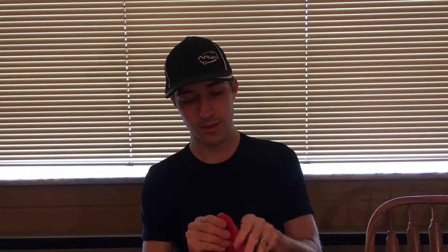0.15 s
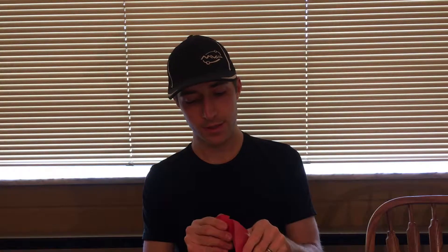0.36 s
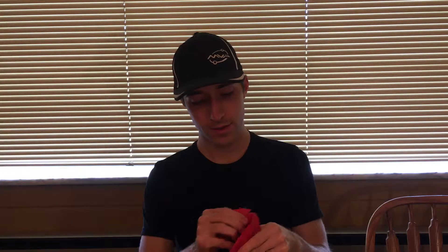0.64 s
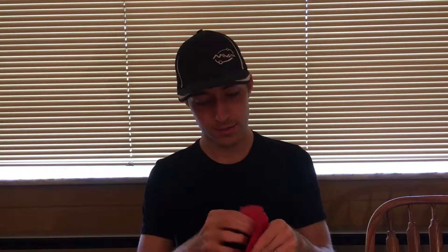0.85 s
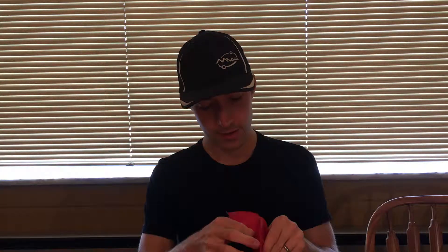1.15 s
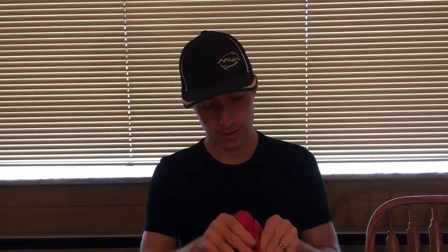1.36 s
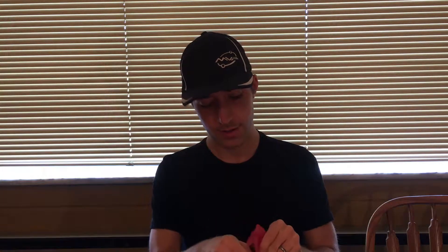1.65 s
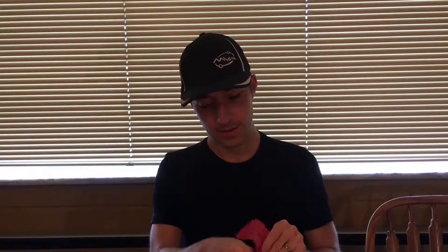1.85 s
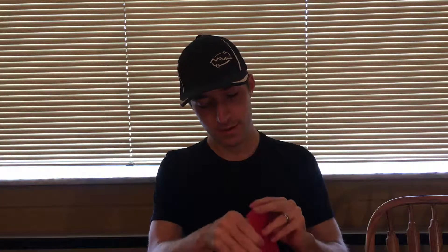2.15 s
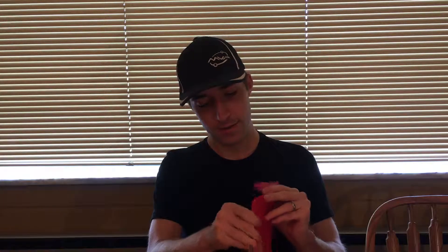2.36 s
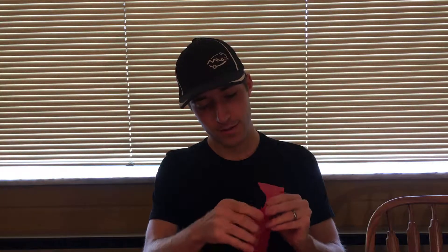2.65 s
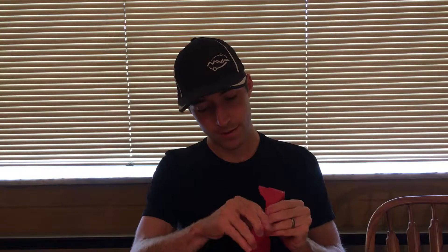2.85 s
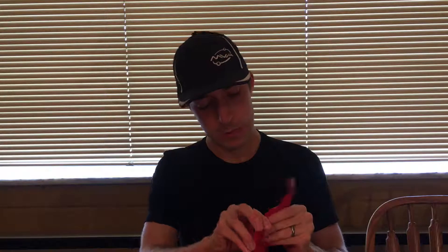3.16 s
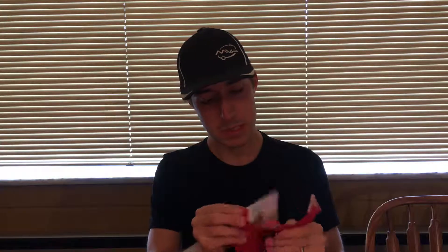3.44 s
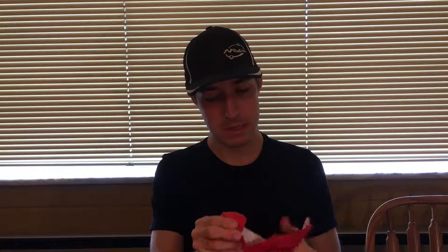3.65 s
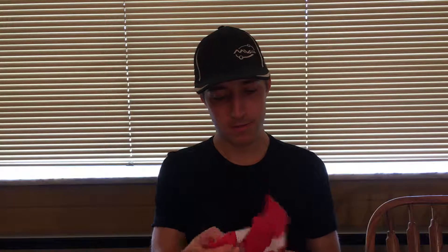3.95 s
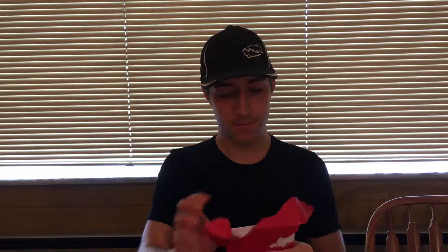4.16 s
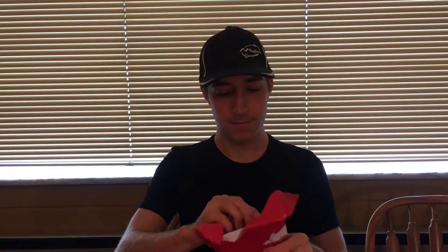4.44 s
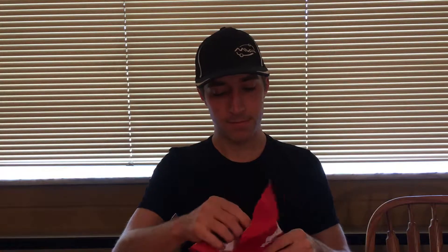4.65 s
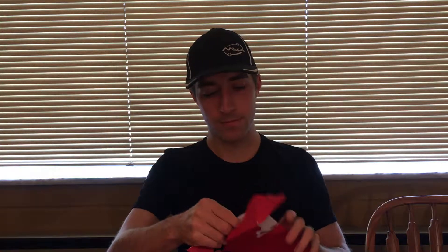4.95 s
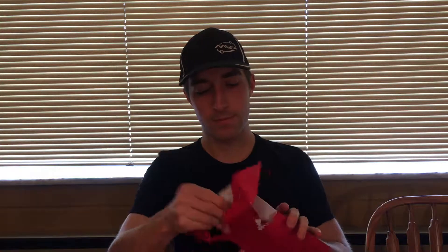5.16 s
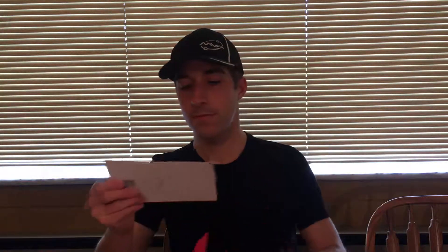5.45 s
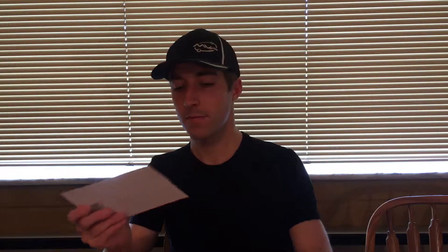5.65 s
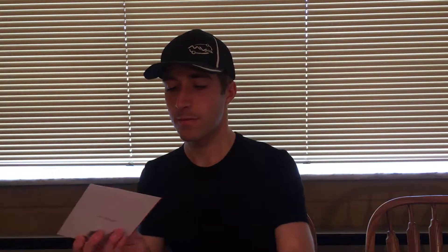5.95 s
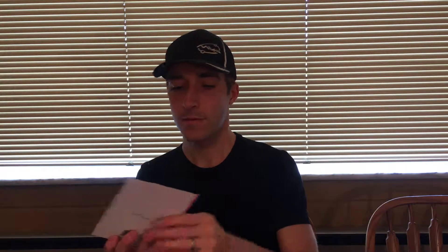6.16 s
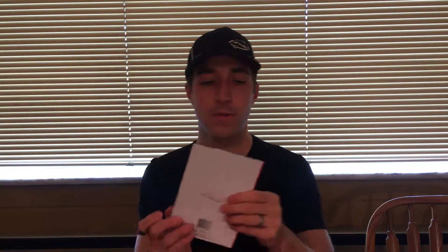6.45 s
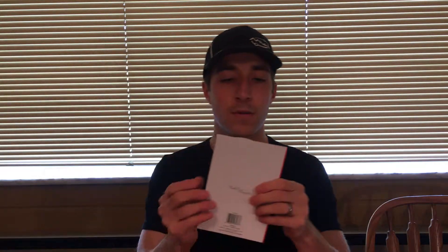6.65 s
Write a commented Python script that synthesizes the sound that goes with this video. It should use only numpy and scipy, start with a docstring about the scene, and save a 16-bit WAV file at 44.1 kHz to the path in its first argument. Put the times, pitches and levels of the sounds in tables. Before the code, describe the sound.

Crisp paper tearing comes in uneven bursts with light rubbing between, fading to faint card handling over a very quiet indoor rumble and hum.

```python
"""Small room: a paper envelope is ripped open by hand, in snaps and short crackling rips.
Fingers rub and flex the paper, then a card slides out and is turned over.
Paper sounds are shaped noise: decaying volleys, trains of fibre breaks, slow bursts and friction hiss.
Random decaying echoes follow; filtered noise and two wavering sines give faint rumble and appliance hum."""
import sys
import numpy as np
from scipy import signal
from scipy.fft import rfft, irfft, next_fast_len
from scipy.io import wavfile
from scipy.ndimage import uniform_filter1d, map_coordinates

SR = 44100
rng = np.random.default_rng(int(sys.argv[2]) if len(sys.argv) > 2 else 0)


def digitize_waveform(pressure):
    """Quantize a signal to 16-bit integers and store it at the path in sys.argv[1].

    Rows of a 2-D input are taken as channels; values are limited to [-1, 1].
    """
    field = np.atleast_2d(pressure).T
    bounded = np.clip(field, -1, 1)
    quanta = np.round(bounded * 32767).astype(np.int16)
    wavfile.write(sys.argv[1], SR, quanta)


N = 299877
SPLIT_HZ = 3500  # sheet below, fibres above
TOP_HZ = 15950  # band limit


# paper buckles or a glued spot lets go: [t/s, sheet level/dB, crack level/dB], before colouring
SNAPS = [(0.1327, -33, -19.5), (0.1516, -18, -15.5), (0.1585, -27.5, -25), (0.2713, -58.5, -34.5),
         (0.3086, -37, -21), (0.3334, -28, -19.5), (0.504, -34, -28), (0.5915, -52, -26.5),
         (0.5991, -47.5, -25.5), (0.6265, -58, -31), (0.6465, -53, -32), (0.7679, -29, -23),
         (1.2125, -67, -39.5), (1.251, -48, -31.5), (1.277, -33, -28.5), (1.3284, -46, -29.5),
         (1.365, -33, -22.5), (1.449, -21.5, -17), (1.6119, -27.5, -16.5), (2.266, -55, -29.5),
         (2.3289, -28.5, -24), (2.5485, -52, -32), (2.5702, -29, -27), (2.75, -40, -40),
         (2.9057, -19.5, -11), (2.9407, -19.5, -17), (3.196, -20, -16), (3.2579, -20.5, -14),
         (3.4002, -36, -24.5), (3.4273, -38, -20), (3.45, -19.5, -13.5), (3.5202, -22.5, -13),
         (3.55, -29, -14.5), (3.706, -35, -29.5), (3.7473, -23, -23.5), (3.7686, -27, -28.5),
         (4.018, -29, -32.5), (4.7128, -40, -37), (4.863, -48, -46.5), (5.913, -39.5, -32.5),
         (5.988, -58, -37), (6.125, -73, -49.5), (6.2557, -75, -48)]
# snap spectrum: [f/Hz, relative density level/dB]
SNAP_COLOUR = [(150, -26.5), (550, -13), (780, -20), (1150, -10), (2200, -4), (3300, -5.5), (4400, 0.5),
               (5000, -2.5), (6100, 2), (7500, -1.5), (10400, -3.5), (13000, 1), (15800, -1)]


def snaps(burst_s=0.003, tick=0.4, ring_t60_s=0.015, ring_share=0.18, ring_hz=1950, ring_spread=0.54, modes=14):
    """A sharp first break, then a volley a few ms long that rings a new patch of the sheet."""
    t = np.arange(SR // 12) / SR
    volley = (1 - np.exp(-t / 0.000078)) / (1 + (t / burst_s) ** 3)
    volley_rms = np.sqrt(np.mean(volley ** 2))
    sheet, crack = np.zeros((2, N + len(t)))
    for start_s, sheet_db, crack_db in SNAPS:
        breaks = volley * rng.standard_normal(len(t))
        breaks[0] = tick * np.linalg.norm(breaks)
        breaks = volley_rms * unit(breaks)

        modes_hz = ring_hz * np.exp(ring_spread * rng.standard_normal((modes, 1)))
        patch = np.sin(2 * np.pi * modes_hz * t).sum(0) * amp(-60 * t / ring_t60_s)
        ring = volley_rms * unit(signal.fftconvolve(breaks, patch)[:len(t)])

        start = round(start_s * SR)
        sheet[start:start + len(t)] += amp(sheet_db) * (breaks + ring_share * ring)
        crack[start:start + len(t)] += amp(crack_db) * breaks
    return paper(sheet[:N], crack[:N], SNAP_COLOUR)


# running tears: [start t/s, end t/s, first level/dB, last level/dB, sheet level/dB re crack], before trims
RIPS = [(0.057, 0.086, -32, -27, -6), (0.09, 0.172, -23, -25.5, -2.5), (0.301, 0.34, -20, -20, -14),
        (0.592, 0.63, -35.5, -41.5, -6.5), (1.232, 1.404, -50, -30.5, -8.5),
        (1.41, 1.524, -24, -22.5, -7.5), (1.589, 1.669, -23, -25, -8.5), (1.814, 1.885, -32.5, -30, -9),
        (1.886, 1.973, -32, -39.5, -4), (2.275, 2.316, -34, -38, -7), (2.321, 2.345, -35.5, -25, -7),
        (2.564, 2.596, -36, -36, -3), (2.911, 2.982, -30, -47, 1.5), (3.19, 3.241, -24.5, -27.5, -8.5),
        (3.256, 3.336, -19.5, -30, -14), (3.447, 3.547, -25.5, -27, -5.5)]
# rip spectrum: [f/Hz, relative density level/dB]
RIP_COLOUR = [(150, -14.5), (450, -11), (760, -9.5), (1050, -6), (1700, -4), (2900, -1), (4300, -3.5),
              (4950, -4), (6100, 2), (7500, -3), (9000, 2.5), (10400, -2), (13000, 3.5), (15800, 0.5)]


def rips(attack_s=0.0049, release_s=0.0092, jerk_db=2.0, surge_db=-0.5, sheet_trim_db=-2, crack_trim_db=-2.0):
    """A running tear starts quickly, breaks thousands of fibres a second and advances in small jerks."""
    t = np.arange(N) / SR
    sheet, crack = np.zeros((2, N))
    for start_s, end_s, first_db, last_db, sheet_db in RIPS:
        attack = np.clip((t - start_s) / attack_s, 0, 1)
        release = np.exp(-np.clip((t - end_s) / release_s, 0, 20))
        pull = amp(np.interp(t, [start_s, end_s], [first_db, last_db])) * attack * release
        crack += pull
        sheet += pull * amp(sheet_db)

    jerks_db = jerk_db * np.clip(wobble(420), -2, 2)
    surges_db = surge_db * np.clip(wobble(130), -2, 2)
    advance = amp(jerks_db + surges_db)
    breaks = bending(fibres(rate_hz=11000, spread_db=4.5) * advance, depth_db=2)
    return paper(amp(sheet_trim_db) * sheet * breaks, amp(crack_trim_db) * crack * breaks, RIP_COLOUR)


# a fold or the card flips over: [t/s, level/dB before colouring, length/s]
FLAPS = [(0.29, -32, 0.0099), (0.4225, -39, 0.0078), (0.487, -35.5, 0.014), (0.77, -26.5, 0.0046),
         (1.022, -46, 0.0089), (2.08, -36.5, 0.0091), (2.1405, -35, 0.0097), (2.229, -30, 0.0052),
         (2.291, -29, 0.0074), (2.693, -40, 0.0038), (2.783, -31, 0.0058), (3.953, -43.5, 0.0032),
         (3.977, -43.5, 0.0067), (4.564, -47.5, 0.0063), (5.176, -41.5, 0.0084), (5.253, -25.5, 0.011),
         (5.401, -33, 0.01)]
# flap spectrum: [f/Hz, relative density level/dB]
FLAP_COLOUR = [(200, -12), (750, -15), (1150, -3), (2700, -4), (4500, -15.5), (15800, -28.5)]


def flaps(rise_s=0.00035):
    """A broad fold gives way more slowly than a snap and has little treble."""
    t = np.arange(SR // 12) / SR
    sheet = causal(amp(along(FLAP_COLOUR, np.fft.rfftfreq(1024, 1 / SR))))
    push = np.zeros(N + len(t))
    for start_s, level_db, length_s in FLAPS:
        swing = (1 - np.exp(-t / rise_s)) / (1 + (t / length_s) ** 4)
        start = round(start_s * SR)
        push[start:start + len(t)] += amp(level_db) * swing * rng.standard_normal(len(t))
    return signal.fftconvolve(push, sheet)[:N]


# rubbing spectrum: [f/Hz, relative density level/dB]
RUB_COLOUR = [(200, -5), (430, -2.5), (700, -6.5), (1200, -2.5), (1800, -4), (2600, -1.5), (4200, -2.5),
              (4900, -2.5), (6000, 2), (8000, -1), (10300, -0.5), (12800, 2), (15800, 0.5)]


def rubbing(crinkle_db=-5, crinkle_s=0.0021, sheet_trim_db=-4.5, hiss_trim_db=-2, uneven_db=1.0):
    """Sliding paper gives a fine hiss of catching fibres, with sparse crinkles on top."""
    sheet_gain, hiss_gain = sliding() * amp(uneven_db * wobble(45))
    friction = bending(fibres(rate_hz=30000, spread_db=2), depth_db=1)
    crackle = amp(crinkle_db) * crinkles(50, crinkle_s)
    sheet = amp(sheet_trim_db) * sheet_gain * (friction + crackle)
    hiss = amp(hiss_trim_db) * hiss_gain * (friction + crackle / 2)  # buckles sound mostly in the sheet
    return paper(sheet, hiss, RUB_COLOUR)


# finger or card slides; the first row, of zero length, is a hiss already fading as the scene opens: [start t/s,
# end t/s, hiss level/dB before sag and trim, sheet level/dB re hiss]
STROKES = [(0.0, -0, -36.5, 3), (0.343, 0.405, -49.5, 10.5), (0.485, 0.76, -45.5, -5),
           (0.744, 0.792, -40.5, -7), (0.989, 1.124, -49.5, -3.5), (1.193, 1.292, -43, -0.5),
           (1.525, 1.584, -38, -5), (1.963, 2.088, -50, 0.5), (2.176, 2.263, -45.5, 3.5),
           (2.34, 2.472, -44, -5), (2.523, 2.675, -46, 0), (2.712, 2.766, -38, -2),
           (2.8, 2.87, -48.5, -4.5), (3.069, 3.15, -36.5, -10), (3.407, 3.44, -31.5, -7.5),
           (3.56, 3.67, -46.5, -15), (3.697, 3.82, -48, 1), (3.839, 3.864, -37.5, -6.5),
           (3.886, 3.96, -51.5, -3), (3.982, 4.091, -42, -3.5), (4.188, 4.285, -52.5, -16),
           (4.311, 4.314, -46, -3.5), (4.529, 4.585, -47, -3.5), (4.603, 4.758, -52.5, -0.5),
           (4.854, 4.912, -43, -3.5), (4.915, 5.09, -42, -12), (5.116, 5.317, -38, -10.5),
           (5.228, 5.32, -33, -7.5), (5.373, 5.384, -43, -5), (5.844, 5.896, -43, -2.5),
           (5.87, 6.04, -44.5, -5.5), (6.29, 6.388, -56.5, -16), (6.46, 6.48, -63.5, -7)]
# faint stirring of the held paper between slides: [t/s, hiss level/dB before trim]
GRIP = [(0.0, -45), (0.7, -59), (0.95, -60), (1.5, -58.5), (3.0, -55), (3.9, -53.5), (4.4, -66), (4.8, -58),
        (5.4, -62.5), (5.6, -66), (6.79, -75)]


def sliding(rise_share=0.28, release_s=0.02, sag_db_per_s=5.5, grip_sheet_db=-1):
    """Sheet and hiss gains: a stroke gathers speed, its pressure eases, then it coasts to a stop."""
    t = np.arange(N) / SR
    hiss_power = amp(np.interp(t, *np.transpose(GRIP))) ** 2
    sheet_power = hiss_power * amp(grip_sheet_db) ** 2
    for start_s, end_s, hiss_db, sheet_db in STROKES:
        age_s = np.maximum(t - start_s, 0)
        rise_s = rise_share * abs(end_s - start_s) + 1e-6
        speed = np.minimum(age_s / rise_s, 1) * np.exp(-np.clip((t - end_s) / release_s, 0, 20))
        power = (speed * amp(hiss_db - sag_db_per_s * age_s)) ** 2
        hiss_power += power
        sheet_power += power * amp(sheet_db) ** 2
    return np.sqrt(sheet_power), np.sqrt(hiss_power)


def crinkles(rate_hz, length_s):
    """Small buckles at random moments, each a tiny noise burst; rms 1."""
    sizes = np.abs(fibres(rate_hz, spread_db=3))
    decay = np.exp(-np.arange(SR // 20) / SR / length_s)
    bursts = signal.fftconvolve(sizes, decay)[:N]
    return unit(bursts * rng.standard_normal(N))


def fibres(rate_hz, spread_db):
    """Tiny breaks at random moments, of widely differing sizes; rms 1."""
    happens = rng.random(N) < rate_hz / SR
    sizes = amp(spread_db * np.clip(rng.standard_normal(N), -2, 2))
    return unit(happens * sizes * rng.choice([-1, 1], N))


def bending(x, depth_db, bins=5, frames=14):
    """The sheet's resonances wander as the hands bend it; rms 1."""
    z = signal.stft(x, nperseg=256)[2]
    field = uniform_filter1d(rng.standard_normal(z.shape), bins, axis=0)
    field = uniform_filter1d(field, frames, axis=1)
    return unit(signal.istft(z * amp(depth_db * unit(field)), nperseg=256)[1][:N])


def paper(sheet, crack, colour, size=1024):
    """The flexing sheet radiates the middle range, the fibres themselves the treble."""
    hz = np.fft.rfftfreq(size, 1 / SR)
    gain = amp(along(colour, hz)) / np.sqrt(1 + (hz / TOP_HZ) ** 60)
    low = 1 / (1 + (hz / SPLIT_HZ) ** 8)
    body = signal.fftconvolve(sheet, causal(gain * np.sqrt(low)))
    edge = signal.fftconvolve(crack, causal(gain * np.sqrt(1 - low)))
    return (body + edge)[:N]


# late tail decay: [f/Hz, t60/s]
ROOM_DECAY = [(300, 0.53), (2500, 0.2555), (7000, 0.27), (15000, 0.2)]
# tail level: [f/Hz, level/dB]
ROOM_LEVEL = [(300, 1), (2000, -3), (6000, -5), (15000, -5.5)]


def room_answer(first_s=.007, early_db=3, early_s=0.0032):
    """The nearest surfaces answer first, then the walls; the treble dies soonest."""
    hz, t, z = signal.stft(rng.standard_normal(SR // 2), SR, nperseg=256)
    early = amp(early_db) * np.exp(-t / early_s)  # added to the tail, re its start
    fade = amp(-60 * t / along(ROOM_DECAY, hz)[:, None]) * (1 + early)
    band_norm = np.sqrt(np.mean(fade ** 2, axis=1, keepdims=True) * SR / 2)
    fade *= amp(along(ROOM_LEVEL, hz))[:, None] / band_norm
    return np.pad(signal.istft(z * fade, SR, nperseg=256)[1], (round(first_s * SR), 0))


def room(x, count=100):
    """Each short stretch of sound gets its own random echo tail, so no fixed colour rings through."""
    wet = np.zeros(N + SR)
    step = N // count + 1
    for start in range(0, N, step):
        answer = signal.fftconvolve(x[start:start + step], room_answer())
        wet[start:start + len(answer)] += answer
    return wet[:N]


# room rumble spectrum: [f/Hz, relative density level/dB]
RUMBLE = [(24, -46.5), (33, -24.5), (40, -4.5), (50, -12.5), (95, -8), (130, -7.5), (200, -8.5), (260, -15),
          (440, -16.5), (700, -24.5), (1100, -27.5), (2000, -34), (5000, -51.5), (12500, -44),
          (15800, -47.5)]
# appliance hum lines: [f/Hz, mean rms level/dB]
HUM = [(105.5, -56), (147, -60.5)]


def background(rumble_db=-52, waver_db=2):
    """Low room rumble as shaped noise; appliance lines as sines unsteady in level and phase."""
    t = np.arange(N) / SR
    rumble = unit(filtered(rng.standard_normal(N), lambda hz: amp(along(RUMBLE, hz))))
    hum = np.zeros(N)
    for line_hz, level_db in HUM:
        level = amp(level_db + waver_db * wobble(10))
        hum += level * np.sin(2 * np.pi * line_hz * t + wobble(7.2) / 2)
    return amp(rumble_db) * rumble + np.sqrt(2) * hum


def amp(db):
    """Decibels to gain."""
    return 10 ** (np.asarray(db) / 20)


def unit(x):
    """x at rms 1."""
    return x / np.sqrt(np.mean(x ** 2) + 1e-20)


def along(points, hz):
    """(f/Hz, value) points read on a log frequency axis."""
    f, v = np.transpose(points)
    return np.interp(np.log(hz + 1), np.log(f + 1), v)


def wobble(knots_hz):
    """A smooth random curve through knots_hz random knots a second."""
    knots = rng.standard_normal(int(N * knots_hz / SR) + 4)
    return map_coordinates(knots, [np.arange(N) * knots_hz / SR], mode="nearest")


def filtered(x, response):
    """x times a zero-phase response of frequency."""
    m = next_fast_len(N + SR // 2)
    return irfft(rfft(x, m) * response(np.fft.rfftfreq(m, 1 / SR)), m)[:N]


def causal(gain):
    """The minimum-phase impulse response of a gain curve, with energy 1."""
    cepstrum = irfft(np.log(np.maximum(gain, 1e-6)))
    half = len(cepstrum) // 2
    cepstrum[1:half] *= 2
    cepstrum[half + 1:] = 0
    response = irfft(np.exp(rfft(cepstrum)))
    return response / np.linalg.norm(response)


def scene():
    """Paper, its echoes and the background, the same in both channels."""
    envelope = snaps() + rips() + flaps() + rubbing()
    mono = envelope + room(envelope) + background()
    return np.array([mono, mono])


def record(dry):
    """Zero-phase brick-wall low-pass at TOP_HZ."""
    return np.array([filtered(channel, lambda hz: hz < TOP_HZ) for channel in dry])


dry = scene()
out = record(dry)
digitize_waveform(out)
```